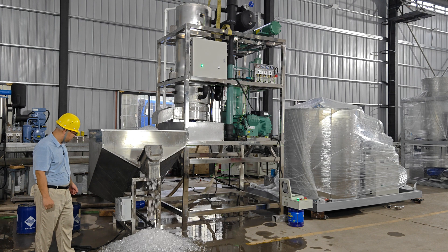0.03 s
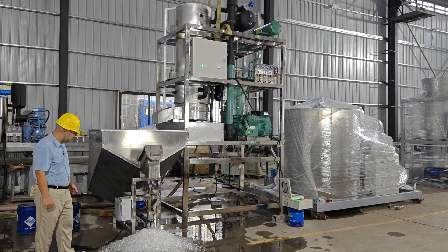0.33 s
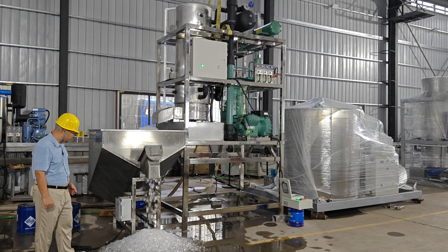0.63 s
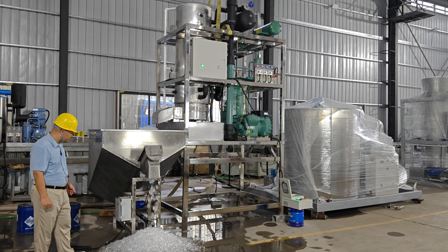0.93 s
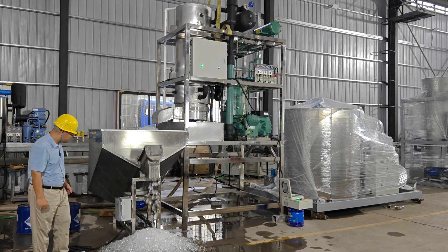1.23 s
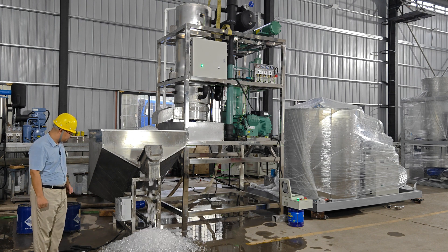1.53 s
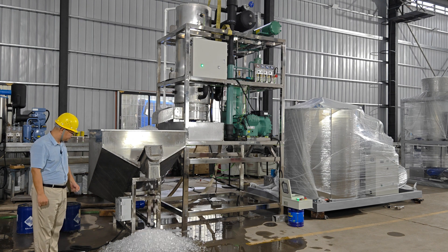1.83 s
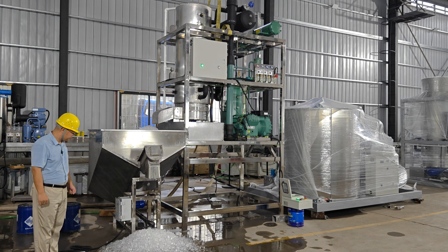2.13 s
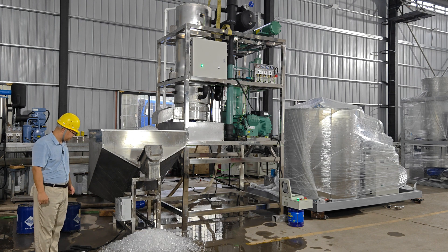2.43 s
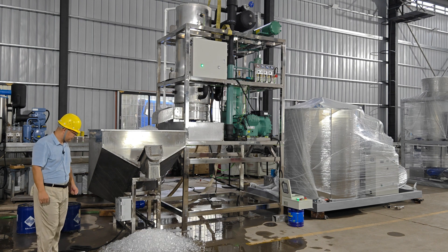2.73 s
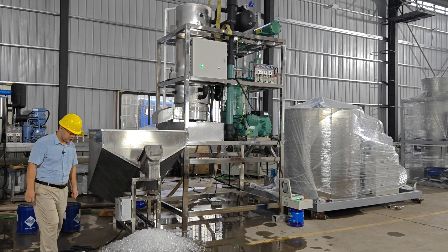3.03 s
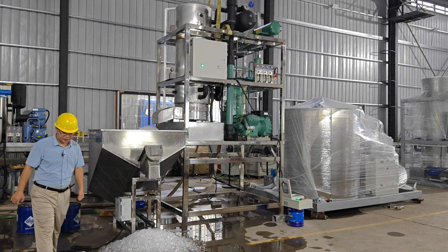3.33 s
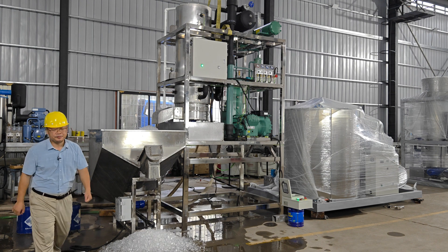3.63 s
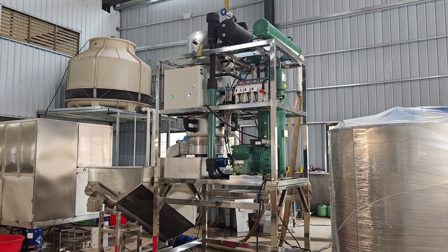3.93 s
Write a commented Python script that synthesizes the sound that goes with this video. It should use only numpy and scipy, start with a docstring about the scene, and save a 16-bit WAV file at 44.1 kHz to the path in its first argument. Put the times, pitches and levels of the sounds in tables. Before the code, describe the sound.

Ice pieces clatter and splinter onto a pile close to the microphone, while lumps thump a steel hopper and ring its chute. The flow thins to single clicks and a trickle, then faint footsteps cross a factory hall's wet floor.

```python
"""Tube ice tumbling from a steel hopper down a chute onto a pile, close to one microphone in a factory hall.
Pieces crack, ring and splinter as they land; lumps thump the hopper's panels and ring the chute.
After two seconds the stream thins to single pieces and a trickle. The pile settles with a few clicks
while a man shuffles and steps off across wet concrete. The machine frame rumbles low underneath."""
import sys
import numpy as np
from scipy import signal
from scipy.fft import rfft, irfft, next_fast_len
from scipy.io import wavfile
from scipy.ndimage import map_coordinates

SR = 44100
rng = np.random.default_rng(int(sys.argv[2]) if len(sys.argv) > 2 else 0)


def transcribe(u):
    """Save the signal u as a 16-bit wav file named by the first command-line argument.

    u: samples, shape (n,) or (channels, n), limited to [-1, 1]; the rate is SR.
    q: integer samples, one column per channel.
    """
    v = np.clip(np.atleast_2d(u).T, -1, 1)
    q = np.round(v * 32767).astype(np.int16)
    wavfile.write(sys.argv[1], SR, q)


N = 176400


def amp(db):
    return 10 ** (np.asarray(db) / 20)


def unit(x):
    return x / np.sqrt(np.mean(x ** 2) + 1e-20)


def along(points, hz):
    """Read (freq_hz, value) points on a log frequency axis."""
    freqs, values = np.transpose(points)
    return np.interp(np.log(hz + 1), np.log(freqs + 1), values)


def curve(rows):
    """One value per sample from (time_s, value) rows."""
    return np.interp(np.arange(N) / SR, *np.transpose(rows))


def coloured(x, gain_db):
    """x at rms 1, filtered by gain_db(hz)."""
    return unit(irfft(rfft(x) * amp(gain_db(np.fft.rfftfreq(len(x), 1 / SR))), len(x)))


def noise(points, size):
    """Noise of rms 1 with a (freq_hz, gain_db) spectrum."""
    return coloured(rng.standard_normal(size), lambda hz: along(points, hz))


def add(out, start_s, x):
    """Mix x into out from start_s."""
    i = max(round(start_s * SR), 0)
    out[i:i + len(x)] += x[:len(out[i:])]


def shaped(x, envelope):
    """x under an envelope, with the energy that the envelope prescribes."""
    y = x * envelope
    return y * np.sqrt(np.sum(envelope ** 2) / (np.sum(y ** 2) + 1e-20))


def swell(t, length_s, rise_s, t60_s):
    """Rise, hold, and release after length_s."""
    return np.clip(t / rise_s, 0, 1) * amp(-60 * np.maximum(t - length_s, 0) / t60_s)


def wobble(per_s, size):
    """A smooth random curve with per_s knots a second."""
    return map_coordinates(rng.standard_normal(size // 100), [np.arange(size) * per_s / SR], mode="mirror")


def contacts(per_s, spread_db, size):
    """A train of random tiny impacts of uneven strength."""
    out, hit = np.zeros(size), rng.random(size) < per_s / SR
    strength = rng.standard_normal((2, size), dtype=np.float32)[:, hit]
    out[hit] = np.sign(strength[0]) * amp(spread_db * np.clip(strength[1], -2, 2))
    return out


def resonances(hz, modes, t60_s):
    """Gain in dB of a few modes with one decay time."""
    half_width = np.log(1000) / (2 * np.pi * t60_s)
    return 10 * np.log10(np.sum(1 / (1 + ((hz - modes[:, None]) / half_width) ** 2), axis=0))


# small chips landing on the pile: freq_hz, gain_db
CHIP_SPECTRUM = [(180, -41), (300, 3), (978, -16), (1280, 6), (2740, -0.5), (4090, 2), (4750, -1),
                 (7200, -1), (11900, -20.5), (16000, -46.5)]
def chips():
    """Countless chips patter and clink in clumps, ringing briefly on many pitches."""
    patter = coloured(contacts(1400, 2, N), lambda hz: along(CHIP_SPECTRUM, hz))
    clinks, t = np.zeros(N), np.arange(SR // 40) / SR
    for hz in np.linspace(1102, 13190, num=40):
        ping = np.sin(2 * np.pi * hz * rng.uniform(1.0, 1.03) * t) * swell(t, .00063, .0011, t60_s=.02)
        hits = contacts(per_s=55, spread_db=4, size=N)
        clinks += amp(along(CHIP_SPECTRUM, hz)) * signal.oaconvolve(hits, ping)[:N]
    clumps = amp(2.5 * wobble(220, N))
    return unit(clumps * unit(patter + amp(2) * unit(clinks)))


# chips and meltwater coming off the chute: time_s, level_db
STREAM_LEVEL = [(0, -26), (.14, -29.5), (.3, -23.5), (.345, -37), (.42, -23), (.6, -32), (.72, -32.5),
                (.8, -25.5), (.98, -23), (1.12, -30.5), (1.24, -23), (1.3, -27.5), (1.45, -37),
                (1.56, -22.5), (1.61, -34.5), (1.67, -23), (1.72, -31.5), (1.8, -24.5), (1.86, -32.5),
                (1.92, -21), (1.96, -33), (2.1, -32), (2.3, -42), (2.55, -44), (2.85, -50.5), (3.02, -58.5),
                (3.2, -57.5), (3.45, -52), (3.9, -59)]
# meltwater: freq_hz, gain_db
TRICKLE_SPECTRUM = [(350, -9), (600, -4.5), (1140, -13.5), (1750, 1), (3000, -10), (3900, -6), (6000, -17),
                    (7500, -40), (10000, -41)]
def stream():
    """The pour of chips under the big pieces gives way to a faint, uneven trickle."""
    end_s, fade_s = 2.26, .5
    pouring = np.clip((end_s - np.arange(N) / SR) / fade_s, 0, 1)
    pour = amp(-3) * pouring * chips()
    trickle = unit(noise(TRICKLE_SPECTRUM, N) * amp(2.2 * wobble(40, N)))
    return amp(curve(STREAM_LEVEL)) * (pour + amp(-5) * (1 - pouring) * trickle)


# shaking of the machine frame: time_s, level_db
FRAME_LEVEL = [(0.0, -41.5), (0.4, -36.5), (0.62, -32), (1.0, -40), (1.35, -38), (1.6, -54.5),
               (2.25, -57.5), (3.35, -54.5), (3.95, -51.5)]
# the frame's rumble and the hall's room tone: freq_hz, gain_db
FRAME_SPECTRUM = [(25, -40.5), (60, -21.5), (110, -5.5), (190, 0), (260, -0.5), (340, -10.5), (500, -10.5),
                  (700, -16), (1200, -16), (2500, -74)]
AIR_SPECTRUM = [(25, -24.5), (55, -2.5), (115, -.5), (180, -15), (400, -31), (1500, -78)]
def frame_and_air():
    """The machine frame rumbles unevenly over the steady low air of the hall."""
    sway_db = 3 * wobble(12, N)
    frame = amp(curve(FRAME_LEVEL) + 1.5 + sway_db) * noise(FRAME_SPECTRUM, N)
    return frame + amp(-62) * noise(AIR_SPECTRUM, N)


# struck ice, close up: freq_hz, gain_db
ICE_SPECTRUM = [(200, -18), (900, 2), (1800, -0.5), (4000, 1), (7300, 4), (8500, -7.5), (10000, -34),
                (16000, -44.5)]
def ice_colour(pitch_hz, octaves, skirt_db):
    """Spectrum of ice that rings most around one pitch."""
    def gain_db(hz):
        bell = np.exp(-.5 * (np.log2((hz + 1) / pitch_hz) / octaves) ** 2)
        return along(ICE_SPECTRUM, hz) + skirt_db * (1 - bell)
    return gain_db


# flying shards: freq_hz, gain_db
SHARD_SPECTRUM = [(3000, -40), (7000, 2), (8700, 1), (12000, -4), (13500, -21), (16000, -26.5)]
def splinters(size):
    """A spray of tiny shards ringing on a dozen high pitches."""
    modes = rng.uniform(6000, 16000, size=12)
    hits = contacts(3000, 2, size)
    return coloured(hits, lambda hz: along(SHARD_SPECTRUM, hz) + resonances(hz, modes, t60_s=.011))


# handfuls of ice sliding over each other: start_s, length_s, level_db, pitch_hz
ICE_SLIDES = [(.008, 0.048, -23.5, 7900), (0.111, 0.074, -21.5, 6500), (0.287, 0.019, -15, 1950),
              (.725, 0.036, -25.5, 3260), (0.772, 0.09, -23.5, 7000), (0.899, 0.05, -22.5, 3900),
              (1.018, 0.032, -25.5, 2723), (1.08, 0.07, -19.5, 4730), (1.318, 0.05, -25, 9000),
              (1.477, 0.053, -28, 5960), (1.504, 0.065, -20, 4100), (1.64, 0.045, -21.5, 6000),
              (1.756, 0.033, -18, 6300), (2.022, 0.029, -27, 4660), (2.071, 0.021, -19.5, 2250),
              (2.184, 0.021, -27, 3940), (2.4, 0.028, -40, 1820), (2.878, 0.04, -49, 5350),
              (2.981, 0.037, -47, 4520), (3.305, 0.034, -44.5, 5920), (3.387, 0.061, -39, 3770),
              (3.533, 0.012, -54, 4010), (0.954, 0.057, -17, 3910)]
def slides():
    """Dense runs of contacts ring a handful of pieces; hard, bright runs splinter most."""
    out, t = np.zeros(N), np.arange(SR // 4) / SR
    for start_s, length_s, level_db, pitch_hz in ICE_SLIDES:
        colour = ice_colour(pitch_hz, octaves=.5, skirt_db=-15)
        modes = rng.uniform(1100, 10000, size=30)
        run = coloured(contacts(2500, 4, len(t)), lambda hz: colour(hz) + resonances(hz, modes, t60_s=.05))
        shards = amp(level_db + 11) * (pitch_hz / 6500) ** 2 * splinters(len(t))
        clumps = amp(3.5 * wobble(330, len(t)))
        envelope = swell(t, .7 * length_s, rise_s=.0097, t60_s=.05)
        add(out, start_s, amp(level_db) * shaped(clumps * (run + shards), envelope))
    return out


# pieces striking the pile near the microphone, rattle and splinters relative to the strike:
# start_s, level_db, pitch_hz, rattle_db, splinter_db
PILE_STRIKES = [(0.0516, -9.5, 5210, -7, -11.5), (0.057, -12.5, 4700, -3.5, -20),
                (0.0674, -18, 4940, -3.5, -8), (0.11, -10, 6290, -9, -18), (0.1387, -15, 6380, -11, -21),
                (0.146, -13.5, 6280, -18, -26), (0.2366, -14, 6210, -4, -20),
                (0.2463, -9, 7300, -17, -32.5), (0.2541, -13, 6300, -12.5, -28),
                (0.2847, -14.5, 5100, -13, -17.5), (0.2982, -17, 4150, -17.5, -3.5),
                (0.3632, -12, 5730, -6.5, -15.5), (0.3723, -14.5, 6820, -4, -16),
                (0.4303, -24, 6040, -13, -7), (0.4645, -15, 6100, -7, -29.5),
                (0.5228, -14, 3790, -7, -15.5), (0.6305, -8.5, 6520, -8.5, -18.5),
                (0.7614, -17.5, 4870, -2.5, -18), (0.8456, -19, 6780, 5, -31),
                (0.8628, -13, 6850, -6.5, -16.5), (0.8676, -11, 6670, -14, -9.5),
                (0.916, -10, 6460, -9.5, -31.5), (0.9247, -11.5, 6370, -5, -16),
                (0.943, -16.5, 4530, -7.5, -7.5), (0.9643, -10, 4650, -13.5, -7),
                (0.981, -18, 4080, -24, -15), (0.9876, -18, 4450, -24.5, -14),
                (1.0104, -10, 5980, -9, -30.5), (1.0642, -20, 6520, -1, -31),
                (1.104, -16.5, 5030, -10, -15.5), (1.117, -15, 5140, -17.5, -16.5),
                (1.1485, -15, 6140, -5, -20.5), (1.2645, -16, 3560, -8.5, -27),
                (1.4719, -9, 4446, -11.5, -22), (1.574, -25, 4060, -10.5, -28.5),
                (1.6281, -15, 5040, -6, -16), (1.6337, -13.5, 6300, -5.5, -15.5),
                (1.6693, -15, 6500, -9, -11), (1.6855, -8, 5490, -17, -28.5), (1.733, -26, 3460, -5, -24),
                (1.7454, -16, 5030, 1, -22), (1.7751, -22, 3930, -11.5, -22),
                (1.7898, -9, 5593, -6.5, -23.5), (1.905, -21.5, 3730, -15, -34),
                (1.984, -17.5, 7100, -7.5, -16.5), (2.0831, -11, 2857, -13, -21.5),
                (2.1683, -19.5, 4360, -3, -22), (2.178, -16, 4130, -1, -52),
                (2.1955, -29.5, 4170, -13, -42.5), (2.266, -25, 6630, -3, -14.5),
                (2.3965, -24.5, 2936, 0, -38.5), (2.9402, -23.5, 4900, -23, -12),
                (2.9488, -22, 4040, -12.5, -4.5), (3.339, -24, 4810, -12.5, -28.5)]
def clacks():
    """Each piece cracks, rings for a few ms on its own modes, and rattles on against its neighbours."""
    out, t = np.zeros(N), np.arange(SR // 8) / SR
    crack_t60_s, ring_t60_s = .011, .017
    blow = swell(t, .0018, rise_s=.0006, t60_s=crack_t60_s)
    settling = swell(t, .006, rise_s=.004, t60_s=.06)
    ring_gain = amp(5 + 60 * t * (1 / crack_t60_s - 1 / ring_t60_s))  # the ring outlasts the crack
    for start_s, level_db, pitch_hz, rattle_db, splinter_db in PILE_STRIKES:
        colour = ice_colour(pitch_hz, octaves=.73, skirt_db=-12.5)
        modes = pitch_hz * np.exp(np.r_[0, rng.normal(-.1, .42, size=5)])
        weights = amp(colour(modes) + np.r_[3, rng.normal(-2, 3, size=5)])
        cycles = modes[:, None] * t + rng.random((len(modes), 1))
        ring = unit(weights @ np.sin(2 * np.pi * cycles))
        crack = coloured(rng.standard_normal(len(t)), colour)
        strike = shaped(crack + ring_gain * ring, blow)
        hits = contacts(1500, 2, len(t))
        jostle = coloured(hits, lambda hz: colour(hz) + resonances(hz, modes, t60_s=.026))
        rattle = amp(rattle_db) * shaped(jostle, settling)
        shards = amp(splinter_db + 4.5) * shaped(splinters(len(t)), blow + amp(rattle_db) * settling)
        add(out, start_s, amp(level_db - .5) * (strike + rattle + shards))
    return out


# chips snapping off the ice: start_s, level_db, pitch_hz
CHIP_SNAPS = [(.111, -33, 14700), (.126, -30, 13500), (.481, -28.5, 12200), (.509, -31, 13600),
              (0.693, -27.5, 11800), (.729, -31.5, 13800), (0.958, -30.5, 11880), (1.321, -21, 10200),
              (1.503, -20, 10000), (2.7, -52.5, 7540), (2.888, -47.5, 8230), (3.322, -50, 7380)]
def snaps():
    """A chip breaks off with a short, glassy tick."""
    out, t = np.zeros(N), np.arange(SR // 16) / SR
    for start_s, level_db, pitch_hz in CHIP_SNAPS:
        burst = rng.standard_normal(len(t))
        ring = coloured(burst, lambda hz: -20 * np.log10(1 + ((hz - pitch_hz) / 1100) ** 2))
        add(out, start_s, amp(level_db) * shaped(ring, swell(t, .002, rise_s=.001, t60_s=.018)))
    return out


# lumps tumbling inside the hopper: start_s, length_s, rumble_db, drum_db, knock_db
HOPPER_THUMPS = [(0.123, 0.079, -39.5, -36, -45.5), (0.254, 0.01, -29.5, -55.5, -33.5),
                 (0.42, 0.15, -32.5, -27, -37), (0.52, 0.064, -17.5, -14.5, -30),
                 (0.587, 0.055, -21.5, -20.5, -29.5), (0.642, 0.052, -27.5, -16.5, -21),
                 (0.676, 0.026, -12.5, -18.5, -35), (0.87, 0.085, -33, -18.5, -33.5),
                 (1.081, 0.011, -34.5, -20.5, -56.5), (1.145, 0.1, -22, -10, -33.5),
                 (1.249, 0.036, -24, -16, -26.5), (1.331, 0.065, -16.5, -8.5, -32.5),
                 (1.41, 0.0083, -21.5, -30, -20.5), (1.481, 0.025, -26, -27.5, -27.5),
                 (1.64, 0.024, -52.5, -16.5, -26), (2.072, 0.0066, -33, -60.5, -36),
                 (2.309, 0.012, -36, -47, -68)]
# the panels' rumble and the knocks on them: freq_hz, gain_db
PANEL_SPECTRUM = [(60, -46), (130, -13.5), (170, -10.5), (215, -10), (254, 2.5), (295, -6.5), (345, 1.5),
                  (430, -2.5), (560, -3), (700, -14.5), (900, -12), (6000, -100)]
KNOCK_SPECTRUM = [(300, -23.5), (700, -3.5), (1200, -2.5), (1900, -5.5), (3000, -20.5), (9000, -83)]
def hopper():
    """Tumbling lumps shake the hopper's panels, which rumble, knock and give one unsteady drum-like note."""
    out, t = np.zeros(N), np.arange(SR // 3) / SR
    panel_hz, drum_hz = 254, 632.9
    for start_s, length_s, rumble_db, drum_db, knock_db in HOPPER_THUMPS:
        panel_note = amp(-7) * np.sin(2 * np.pi * (panel_hz * t + rng.random()))
        shaking = noise(PANEL_SPECTRUM, len(t)) + panel_note
        rumble = shaped(shaking, swell(t, .67 * length_s, rise_s=.0096, t60_s=.14))
        hits = coloured(contacts(900, 1.8, len(t)), lambda hz: along(KNOCK_SPECTRUM, hz))
        knock = shaped(hits, swell(t, .8 * length_s, rise_s=.017, t60_s=.1))
        jitter = .09 * wobble(140, len(t))
        drum = np.sin(2 * np.pi * (drum_hz * t + jitter)) * swell(t, .025, rise_s=.013, t60_s=.061)
        add(out, start_s, amp(rumble_db) * rumble + amp(knock_db) * knock + amp(drum_db) * drum)
    return out


# blows on the steel chute, close by: start_s, level_db, centre_hz
CHUTE_BLOWS = [(0.258, -15, 1040), (1.388, -7.5, 1340), (1.502, -15.5, 1320), (1.518, -8.5, 2830),
               (1.528, -10, 2340), (1.766, -9.5, 3300), (1.776, -16.5, 4910)]
# modes of the chute: pitch_hz, level_db
CHUTE_MODES = [(1135, -6.5), (1246, 1), (1953, -4.5), (2110, -1), (2745, -13.5), (3410, 2.5), (3772, 0),
               (4420, -4.5), (5255, -3), (5545, -2), (6950, -4.5)]
def chute():
    """The steel chute rings briefly, roughened by the ice on it; where it is struck picks the modes."""
    out, t = np.zeros(N), np.arange(SR // 4) / SR
    mode_hz, mode_db = np.transpose(CHUTE_MODES)[:, :, None]
    width_octaves = .19
    for start_s, level_db, centre_hz in CHUTE_BLOWS:
        weights = amp(mode_db) / (1 + (np.log2(mode_hz / centre_hz) / width_octaves) ** 2)
        cycles = mode_hz * t + rng.random(mode_hz.shape)
        jitter = .095 * np.array([wobble(140, len(t)) for _ in mode_hz])
        ring = np.sum(weights / np.linalg.norm(weights) * np.sin(2 * np.pi * (cycles + jitter)), axis=0)
        add(out, start_s, amp(level_db) * ring * swell(t, .0016, rise_s=.0016, t60_s=.09))
    return out


# the man shifting his feet: start_s, length_s, level_db
FOOT_SHIFTS = [(2.37, 0.051, -45.5), (2.55, 0.042, -48.5), (2.603, 0.045, -41), (2.757, 0.022, -39.5),
               (2.918, 0.014, -44), (2.98, 0.099, -45), (3.271, .03, -53), (3.607, 0.063, -49)]
def shuffles():
    """Weight shifting on the floor makes dull, low bumps."""
    out, t = np.zeros(N), np.arange(SR // 3) / SR
    centre_hz = 178
    for start_s, length_s, level_db in FOOT_SHIFTS:
        thud = coloured(rng.standard_normal(len(t)), lambda hz: -7 * np.log2((hz + 1) / centre_hz) ** 2)
        add(out, start_s, amp(level_db) * shaped(thud, swell(t, length_s, rise_s=.0054, t60_s=.097)))
    return out


# grit on the floor, faint at the microphone: start_s, level_db, pitch_hz
GRIT_TICKS = [(2.525, -49, 2270), (2.682, -42, 1690), (2.725, -47, 2010), (2.752, -42.5, 1880),
              (2.781, -37.5, 1700), (2.791, -56, 1650), (2.865, -39.5, 1560), (2.884, -41, 1640),
              (3.19, -56, 3700), (3.618, -49.5, 1480)]
def ticks():
    """Grit gives small, dull ticks, each in a narrow band."""
    out, t = np.zeros(N), np.arange(SR // 16) / SR
    for start_s, level_db, pitch_hz in GRIT_TICKS:
        tick = coloured(rng.standard_normal(len(t)), ice_colour(pitch_hz, octaves=.44, skirt_db=-48))
        add(out, start_s, amp(level_db) * shaped(tick, swell(t, .0018, rise_s=.0021, t60_s=.054)))
    return out


# shoes on the wet concrete: start_s, length_s, thud_db, grit_db
FOOTFALLS = [(3.775, 0.016, -57, -37), (3.811, 0.032, -35.5, -39), (3.858, 0.049, -34, -36.5),
             (3.913, 0.044, -38, -56)]
# the sole and the grit under it: freq_hz, gain_db
SOLE_SPECTRUM = [(40, -7), (120, 12), (300, 7.5), (550, 3.5), (900, -22), (3000, -54.5)]
GRIT_SPECTRUM = [(300, 4.5), (1400, 2.5), (2700, -9), (3900, 0.5), (5800, -12.5), (8000, -20), (15000, -63)]
def steps():
    """The sole thuds softly and scrapes grit, whose grains ring on a few pitches."""
    out, t = np.zeros(N), np.arange(SR // 4) / SR
    for start_s, length_s, thud_db, grit_db in FOOTFALLS:
        thud = shaped(noise(SOLE_SPECTRUM, len(t)), swell(t, .96 * length_s, rise_s=.011, t60_s=.0374))
        modes = rng.uniform(500, 6500, size=18)
        hits = contacts(2200, 3, len(t))
        grains = coloured(hits, lambda hz: along(GRIT_SPECTRUM, hz) + resonances(hz, modes, t60_s=.026))
        scrape = shaped(grains, swell(t, .28 * length_s, rise_s=.0035, t60_s=.15))
        add(out, start_s, amp(thud_db) * thud + amp(grit_db) * scrape)
    return out


# reverberation of the factory hall: freq_hz, t60_s
HALL_DECAY = [(200, 0.82), (2000, 0.45), (5500, 0.27), (8000, 0.11)]
def hall(x):
    """The hall answers with a diffuse tail whose treble dies first."""
    hz, t, spectra = signal.stft(rng.standard_normal(SR), SR, nperseg=256)
    decay = amp(-60 * t / along(HALL_DECAY, hz)[:, None])
    tail = signal.istft(spectra * decay, SR, nperseg=256)[1]
    return signal.fftconvolve(x, tail / np.linalg.norm(tail))[:N]


def scene():
    """One microphone by the pile: ice, steel and feet up close, the hall well behind them."""
    near = clacks() + snaps() + slides() + hopper() + chute() + shuffles() + steps() + ticks()
    return (near + amp(-19) * hall(near) + stream() + frame_and_air())[None]


def record(dry):
    """The recorder rounds off the highest peaks, stops, and keeps nothing above its band limit."""
    ceiling, stop_s, top_hz = .85, 3.96, 16000
    rounded = dry / (1 + np.abs(dry / ceiling) ** 6) ** (1 / 6)
    fade = np.clip((stop_s - np.arange(N) / SR) / .01, 0, 1)
    size = next_fast_len(N + SR // 2)
    passband = np.fft.rfftfreq(size, 1 / SR) < top_hz
    return irfft(rfft(rounded * fade, size) * passband, size)[..., :N]


dry = scene()
out = record(dry)
transcribe(out)
```